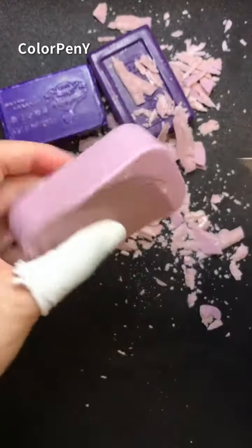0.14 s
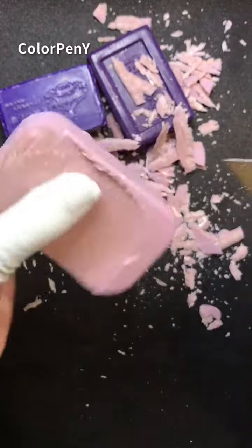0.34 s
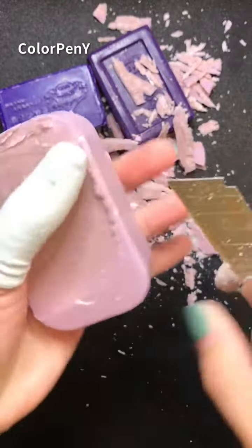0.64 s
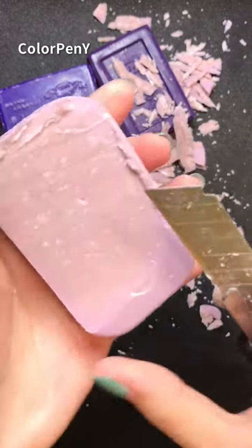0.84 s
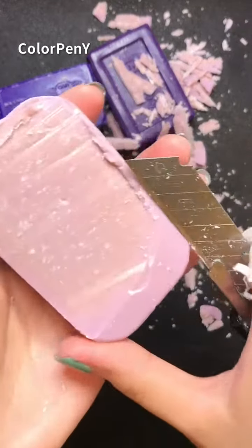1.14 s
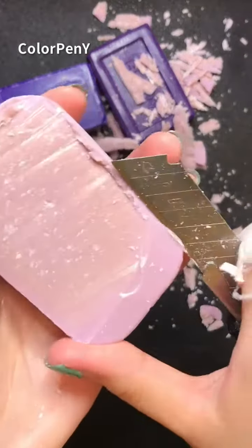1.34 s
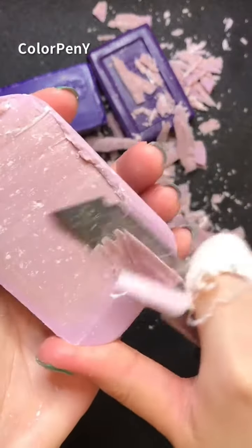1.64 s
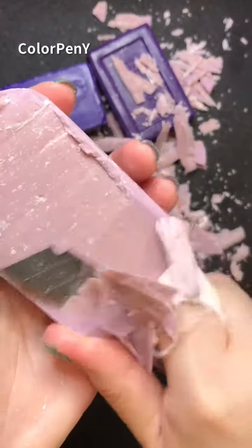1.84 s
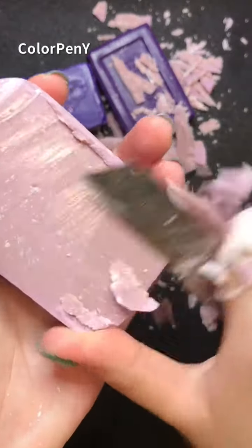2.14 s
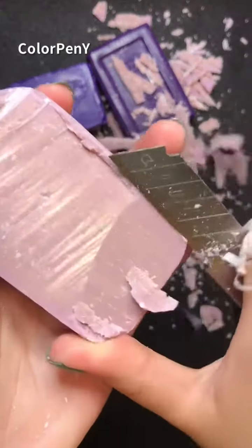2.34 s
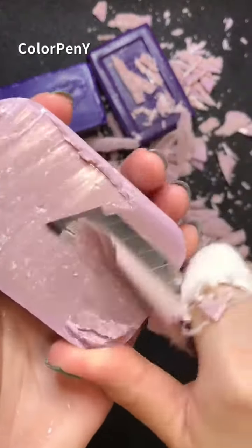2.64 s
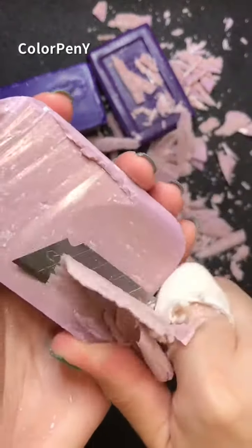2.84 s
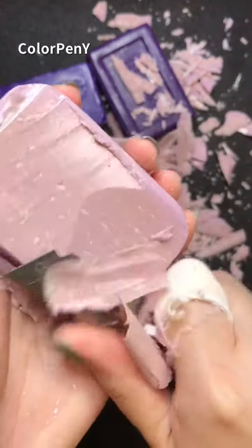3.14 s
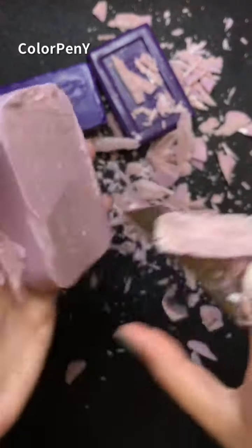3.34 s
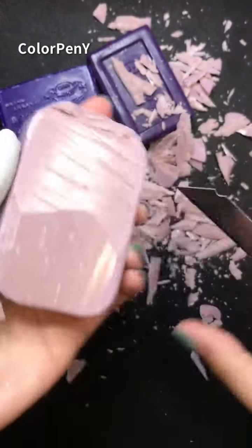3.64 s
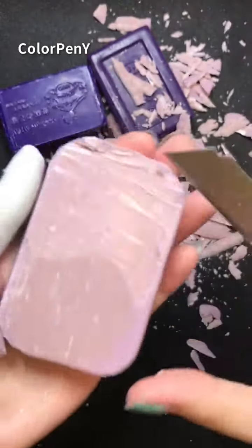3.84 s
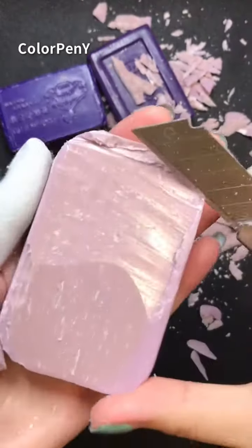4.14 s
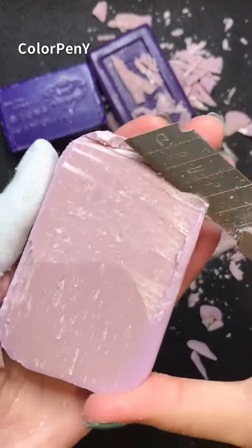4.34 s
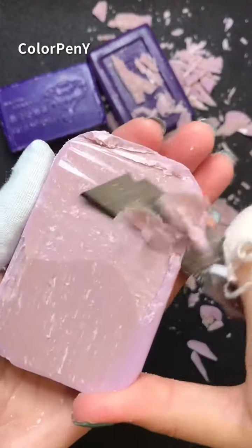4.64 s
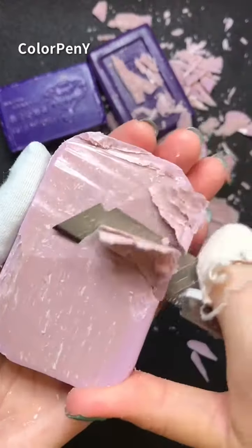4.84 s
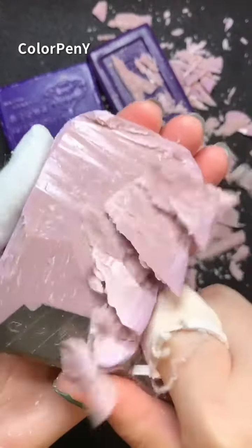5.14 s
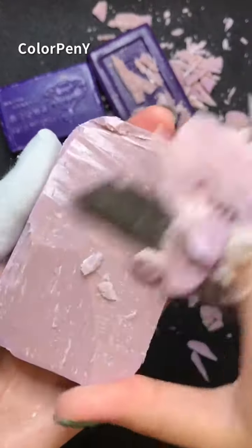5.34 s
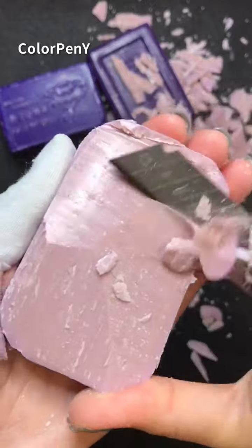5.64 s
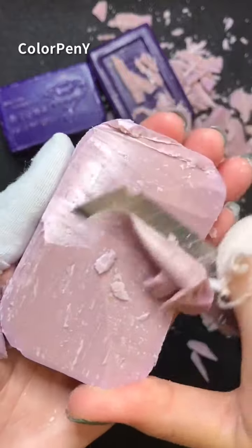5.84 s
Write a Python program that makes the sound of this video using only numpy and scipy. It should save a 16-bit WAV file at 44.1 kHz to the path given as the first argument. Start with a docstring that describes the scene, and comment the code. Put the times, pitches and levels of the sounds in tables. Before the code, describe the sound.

A thin steel blade shaves a bar of hard soap close to the microphone. Light crackles and one small ping of steel come first. Then hissing, scraping strokes follow in groups, with curls snapping off crisply, crumbs pattering and heavier flakes thudding softly onto a table. After a brief lull, the carving builds again to another cluster of sharp cracks. A faint ventilation rumble fills the quiet room.

```python
"""A thin steel blade shaves a hard bar of soap, close up: the curls crack and snap, ringing flake and bar.
The edge slips in bursts of tiny fractures and hisses along the soap while crumbs patter.
The steel pings once on touching the bar and sometimes sings as it drags.
Heavy flakes thud onto a table. A faint ventilation rumble fills the quiet room."""
import sys
import numpy as np
from scipy import signal
from scipy.fft import rfft, irfft, next_fast_len
from scipy.io import wavfile

SR = 44100
rng = np.random.default_rng(int(sys.argv[2]) if len(sys.argv) > 2 else 0)


def generate_wav(sig):
    """Save sig (samples, or channels by samples) to the path in sys.argv[1] as 16-bit PCM at SR."""
    pcm = np.round(np.clip(np.atleast_2d(sig).T, -1, 1) * 32767).astype(np.int16)
    wavfile.write(sys.argv[1], SR, pcm)


N = 265041


def gain(db):
    """Decibels to amplitude."""
    return 10 ** (np.asarray(db) / 20)


def unit_rms(x):
    """Scales to rms 1."""
    return x / np.sqrt(np.mean(x ** 2) + 1e-20)


def log_interp(points, hz):
    """Interpolates on a log-frequency axis."""
    freq_hz, value = np.transpose(points)
    return np.interp(np.log(hz + 1), np.log(freq_hz + 1), value)


def add(mix, start_s, sound):
    """Mixes a sound in at start_s."""
    part = mix[round(start_s * SR):][:len(sound)]
    part += sound[:len(part)]


def colour(x, spectrum):
    """Filters by a spectrum in dB."""
    size = next_fast_len(len(x))
    response = gain(log_interp(spectrum, np.fft.rfftfreq(size, 1 / SR)))
    return irfft(rfft(x, size) * response, size)[:len(x)]


def resonate(x, hz, width_hz):
    """Two-pole resonance."""
    r = np.exp(-np.pi * width_hz / SR)
    return signal.lfilter([1, 0, -r], [1, -2 * r * np.cos(2 * np.pi * hz / SR), r * r], x)


def mode(x, hz, width_hz):
    """Resonance at rms 1."""
    return unit_rms(resonate(x, hz, width_hz))


def flicker(per_s):
    """Straight lines between Gaussian random values."""
    steps = int(N / SR * per_s) + 2
    return np.interp(np.arange(N) / SR * per_s, np.arange(steps), rng.standard_normal(steps))


def grains(per_s, spread_db, wash):
    """Random ticks of uneven size over smooth noise."""
    ticks = gain(spread_db * np.minimum(rng.exponential(1, N), 2)) * (rng.random(N) < per_s / SR)
    puffs = signal.lfilter([1], [1, -0.96], ticks) * rng.standard_normal(N)  # about 0.5 ms each
    return unit_rms(puffs) + wash * rng.standard_normal(N)


def effort(spells, column, rest_db=-np.inf, sag_db_per_s=0):
    """Gain of the hand's work: each spell sets in fast, holds or drifts, then falls to rest."""
    attack_db_per_s, release_db_per_sqrt_s = 700, 51
    t, rows = np.arange(N) / SR, np.array(spells)[:, :, None]
    start_s, end_s = rows[:, 0], rows[:, 1]
    attack_db = attack_db_per_s * np.maximum(start_s - t, 0)
    release_db = release_db_per_sqrt_s * np.sqrt(np.maximum(t - end_s, 0))
    sag_db = sag_db_per_s * (t - (start_s + end_s) / 2)
    level_db = rows[:, column] - attack_db - release_db - sag_db
    return gain(np.maximum(level_db.max(0), rest_db))


# freq_hz, relative_db
AIR_SPECTRUM = [(25, -45), (45, -8.5), (100, -14.5), (300, -17), (480, -24.5), (1700, -33.5), (7000, -46),
                (16000, -44)]
# centre_hz, width_hz, relative_db
RUMBLE_BANDS = [(64.4, 14, 3.5), (147.8, 15.5, -0.5)]
# time_s, level_db
RUMBLE_LEVELS = [(0, -52.5), (0.7, -45), (1.3, -49.5), (1.9, -50), (2.8, -44.5), (3.9, -59.5), (6, -53)]


def ventilation():
    """Steady air noise with narrow rumbling bands that come and go."""
    rumble = sum(gain(db + 0.89 * flicker(per_s=3.06)) * mode(rng.standard_normal(N), hz, width_hz)
                 for hz, width_hz, db in RUMBLE_BANDS)
    rumble_db = np.interp(np.arange(N) / SR, *np.transpose(RUMBLE_LEVELS))
    air = colour(rng.standard_normal(N), AIR_SPECTRUM)
    return gain(-51.5) * unit_rms(air) + gain(rumble_db) * unit_rms(rumble)


# freq_hz, t60_s
ROOM_DECAY = [(500, 0.52), (3000, 0.33), (14000, 0.028)]


def room(x):
    """Diffuse reverb, treble dying first; pieces land in different spots, so two tails alternate."""
    out, predelay = np.zeros(N), np.zeros(260)
    angle = 2 * np.pi * 170 * np.arange(N) / N
    for share in (abs(np.cos(angle)), abs(np.sin(angle))):
        hz, t, spectrum = signal.stft(rng.standard_normal(SR // 2), SR, nperseg=512)
        decay = gain(-60 * t / log_interp(ROOM_DECAY, hz)[:, None])
        tail = np.concatenate([predelay, signal.istft(spectrum * decay, SR, nperseg=512)[1]])
        out += signal.fftconvolve(x * share, tail / np.linalg.norm(tail))[:N]
    return out


# pitch_hz, width_hz, relative_db
TABLETOP_MODES = [(127, 38, 0), (200, 67, 0.5), (252, 140, -1), (409, 165, -4)]
# start_s, peak_db
THUDS = [(1.613, -38), (1.826, -30), (1.945, -35), (2.174, -22.5), (2.361, -22.5), (2.396, -19.5),
         (2.4402, -14), (2.4497, -19.5), (3.012, -25), (3.264, -19.5), (3.293, -21), (3.542, -20),
         (3.683, -17.5), (5.099, -29), (5.419, -24.5), (5.582, -15.5), (5.649, -12.5), (5.705, -21)]


def thuds():
    """Heavy flakes knock the damped table top with a soft push and release."""
    push = np.gradient(np.pad(signal.windows.hann(170), (120, 3000)))
    knock = sum(gain(db) * mode(push, hz, width_hz) for hz, width_hz, db in TABLETOP_MODES)
    knock = signal.lfilter(*signal.butter(2, 95, "high", fs=SR), knock)  # top too small for deep bass
    out = np.zeros(N)
    for start_s, peak_db in THUDS:
        add(out, start_s, gain(peak_db) * knock / abs(knock).max())
    return out


# pitch_hz, relative_db, t60_s
FREE_BLADE_MODES = [(1914, 2, 0.019), (4510, -5, 0.024), (5740, -1, 0.016), (7040, 2.5, 0.012)]


def blade_ping(start_s=1.0305, gain_db=-15, rise_ms=0.53):
    """The free blade taps the bar once and rings briefly."""
    out, t = np.zeros(N), np.arange(0, 0.05, 1 / SR)
    ring = sum(gain(db - 60 * t / t60_s) * np.sin(2 * np.pi * hz * t)
               for hz, db, t60_s in FREE_BLADE_MODES)
    rise = 1 - np.exp(-1000 * t / rise_ms)
    add(out, start_s, gain(gain_db) * rise * ring)
    return out


# pitch_hz, width_hz, relative_db (upper modes only)
DRAGGED_BLADE_MODES = [(1700, 230), (2800, 300, 3), (3600, 260, 1), (5900, 400, -5)]
# start_s, end_s, upper_modes_db, lowest_mode_db
DRAGS = [(2.155, 2.24, -42, -66), (4.38, 4.65, -60, -80), (5.31, 5.4, -51, -46.5)]


def blade_singing():
    """Rough rubbing rings the narrow modes of the steel."""
    rub = grains(per_s=300, spread_db=5, wash=0.7)
    lowest = mode(rub, *DRAGGED_BLADE_MODES[0])
    upper = sum(gain(db) * mode(rub, hz, width_hz) for hz, width_hz, db in DRAGGED_BLADE_MODES[1:])
    return unit_rms(upper) * effort(DRAGS, column=2) + lowest * effort(DRAGS, column=3)


# pitch_hz, width_hz, relative_db
SOAP_MODES = [(1035, 730, 10), (1700, 980, 7.5), (2780, 740, 13.5), (4170, 1160, 12), (4200, 1800, 7),
              (5830, 1500, 15.5), (6870, 1100, 7)]


def soap_ring(strike, first_mode):
    """The bar's modes from first_mode up, each struck more or less by chance."""
    return unit_rms(sum(gain(db + rng.normal(0, 1.5)) * mode(strike, hz, width_hz)
                        for hz, width_hz, db in SOAP_MODES[first_mode:]))


def fizz(strike, band_hz=(6600, 15300)):
    """The treble of a fracture, above the bar's modes."""
    return unit_rms(signal.lfilter(*signal.butter(2, band_hz, "band", fs=SR), strike))


# freq_hz, relative_db
HISS_SPECTRUM = [(2500, -4.5), (4500, -5), (7500, 3.5), (10500, 1.5), (15500, 4)]
# start_s, end_s, crumbs_db, hiss_db
STROKES = [(0, 0.592, -58, -53), (0.668, .78, -56, -54.5), (1.04, 1.19, -54.5, -64),
           (1.441, 1.62, -57.5, -65), (1.616, 1.7, -47, -42), (1.735, 1.843, -53, -43),
           (1.913, 1.958, -45, -44), (2.052, 2.15, -58.5, -53.5), (2.16, 2.247, -47.5, -49),
           (2.36, 2.873, -45.5, -43.5), (2.89, 2.97, -59, -50), (2.977, 3.152, -43.5, -49.5),
           (3.256, 3.81, -43.5, -45), (4.7, 4.96, -59, -49.5), (5.013, 5.237, -50, -47),
           (5.305, 5.526, -55, -47), (5.581, 6.05, -47, -46)]


def scrape():
    """Crumbs patter, each ringing one mode; the edge hisses along the soap in bands that swell by turns."""
    pitched = sum(gain(db) * mode(grains(per_s=60, spread_db=4.5, wash=1.2), hz, width_hz)
                  for hz, width_hz, db in SOAP_MODES)
    dull = mode(grains(per_s=100, spread_db=26, wash=0.65), hz=430, width_hz=1630)
    crumbs = unit_rms(pitched) + 0.7 * dull
    dust = colour(grains(per_s=320, spread_db=5.6, wash=1), HISS_SPECTRUM)
    bands = sum(gain(8 * flicker(per_s=11)) * resonate(dust, hz, 0.099 * hz) * hz
                for hz in np.geomspace(5300, 13800, 7))
    hiss = unit_rms(unit_rms(dust) + unit_rms(bands))
    crumbs *= effort(STROKES, column=2, rest_db=-64, sag_db_per_s=18.5)
    hiss *= effort(STROKES, column=3, rest_db=-68, sag_db_per_s=-0.5)
    return gain(2.5 * flicker(per_s=50)) * (crumbs + hiss)


# peak_s, half_length_ms, ring_db, pitch_hz, treble_db
SLIPS = [(1.129, 23, -47.5, 3850, -71), (1.453, 1.35, -36, 2050, -52), (1.5503, 2.3, -45, 3960, -39),
         (1.5784, 3.4, -38, 3850, -39), (1.654, 1.9, -30.5, 3820, -32.5), (1.6733, 1.5, -34.5, 4360, -31),
         (1.739, 2.1, -32.5, 1680, -39), (1.768, 1.7, -34, 2320, -35), (1.798, 2.1, -32, 2540, -33),
         (1.831, 2.3, -25, 2760, -23), (1.8776, 2.4, -33, 3940, -33), (1.9495, 1.9, -35, 3400, -25.5),
         (2.176, 2.3, -26.5, 3400, -28), (2.356, 0.9, -24, 1960, -22), (2.497, 8.9, -28.5, 2200, -50),
         (2.577, 2.8, -36, 2040, -56), (2.6694, 3.8, -30, 1640, -33.5), (2.731, 4, -34, 1590, -33),
         (2.767, 3.2, -31, 1650, -29.5), (2.793, 2.1, -33, 1730, -33), (3.007, 2.2, -17.5, 2800, -20.5),
         (3.18, 3.3, -42.5, 3770, -42.5), (3.277, 2.5, -21.5, 2660, -50), (4.036, 3.1, -69, 3690, -50),
         (4.12, 1.8, -29.5, 3780, -40.5), (4.432, 3.1, -43.5, 2730, -52), (4.482, 4, -46.5, 2770, -47),
         (4.567, 2.9, -42, 2670, -47), (4.5868, 2.8, -41.5, 2640, -41), (4.6532, 3.3, -39, 2760, -36.5),
         (4.7025, 3.5, -37.5, 1720, -37), (4.807, 5.5, -42, 1720, -39), (5.0168, 3.5, -36, 1710, -29.5),
         (5.1413, 1.8, -30.5, 3500, -32), (5.166, 3.4, -25, 2120, -27.5), (5.313, 1, -33.5, 1620, -53),
         (5.4123, 2.5, -19.5, 3140, -25), (5.491, 7.2, -32.5, 2890, -52), (5.642, 2.8, -29.5, 4100, -55),
         (5.667, 1.4, -26, 2880, -50), (5.914, 2.9, -50, 1700, -41.5)]


def slips():
    """The edge slips: dense tiny fractures under a short swell; fine dust fizzes on after it."""
    out, ms = np.zeros(N), np.arange(-1000, 2000) / SR * 1000
    skew = np.where(ms < 0, 1.15, 0.95)  # rises faster than it fades
    for peak_s, half_length_ms, ring_db, pitch_hz, treble_db in SLIPS:
        noise, roughness = rng.standard_normal((2, len(ms)))
        rub = unit_rms(noise * gain(3.2 * roughness))
        swell_db = -5.5 * abs(skew * ms / (0.89 * half_length_ms)) ** 0.94
        linger_db = np.where(ms > 0, 0.5 * swell_db, swell_db)
        ring = unit_rms(mode(rub, pitch_hz, 0.048 * pitch_hz) + 1.3 * mode(rub, hz=1440, width_hz=3700))
        body = gain(ring_db) * ring + gain(treble_db) * soap_ring(rub, first_mode=4)
        dust = gain(treble_db - 3 + linger_db) * fizz(rub)
        add(out, peak_s + ms[0] / 1000, gain(swell_db) * body + dust)
    return out


# time_s, body_energy_db, pitch_hz, fizz_energy_db (energies re 1 ms at full scale)
CRACKS = [(0.121, -17, 5040, -23.5), (0.2263, -18.5, 2800, -54), (0.244, -21.5, 3900, -32),
          (0.2927, -26.5, 3930, -40), (0.3196, -29, 3840, -44), (0.369, -25, 4070, -30),
          (0.4123, -21.5, 3400, -48), (0.4578, -26.5, 6400, -35), (0.4922, -33, 2730, -34),
          (0.6851, -16, 2340, -25), (0.702, -23.5, 2740, -51), (1.0324, -21, 3000, -19.5),
          (1.752, -34, 5500, -33), (5.227, -49, 6200, -51), (5.247, -39, 6500, -43),
          (2.829, -34, 5500, -28), (2.094, -37.5, 5500, -50), (2.1162, -34, 1780, -55),
          (2.132, -39, 2700, -45), (2.915, -43, 3000, -43), (5.275, -40, 7500, -46),
          (5.767, -32.5, 6500, -46), (5.926, -51, 2500, -42), (1.07, -24, 5240, -33),
          (1.2418, -37, 6150, -55), (1.5748, -33.5, 5320, -45), (1.6161, -22.5, 5030, -26.5),
          (1.692, -22, 5830, -20.5), (1.9132, -28, 2670, -26.5), (2.04, -25, 6200, -33),
          (2.0484, -19.5, 2830, -25), (2.2966, -25.5, 2620, -36), (2.3382, -19, 3340, -22),
          (2.364, -8, 2180, -30), (2.3913, -12, 1810, -14.5), (2.399, -15.5, 2550, -28),
          (2.442, -13, 2410, -23), (2.451, -9.5, 2220, -20), (2.5553, -18.5, 2030, -41),
          (2.714, -31, 2590, -29), (2.8157, -15, 6450, -20), (2.853, -24, 1040, -26),
          (3.0156, -11.5, 1590, -39), (3.14, -24, 5100, -50), (3.222, -31.5, 4320, -51),
          (3.2618, -5.5, 4400, -19), (3.291, -5.5, 3130, -29), (3.298, -17, 3000, -12.5),
          (3.3046, -7, 2900, -27), (3.3081, -12.5, 3100, -30), (3.2473, -16, 1670, -23),
          (3.3977, -26, 8400, -21), (3.469, -26, 4970, -41), (3.4756, -17, 2920, -19),
          (3.499, -21.5, 5100, -28), (3.51, -17, 4700, -23), (3.525, -26, 2800, -40),
          (3.5433, -9, 6000, -31), (3.5524, -8.5, 5060, -16), (3.556, -11.5, 6060, -23),
          (3.628, -28, 3400, -40), (3.657, -19.5, 2060, -52), (3.677, -19, 2680, -26),
          (3.6841, -12.5, 2400, -46), (3.7519, -26.5, 4150, -45), (3.8208, -28.5, 5200, -34),
          (4.509, -34.5, 6300, -33), (4.97, -35, 8000, -40), (5.0995, -13.5, 7100, -18.5),
          (5.1066, -21, 1660, -19), (5.21, -25, 2400, -32), (5.4225, -12, 1950, -34),
          (5.584, -11, 1810, -17), (5.648, -6.5, 2890, -15.5), (5.6488, -7.5, 2550, -12.5),
          (5.6552, -13.5, 2250, -36), (5.622, -28, 2470, -45), (5.686, -39, 6400, -42),
          (5.7062, -10.5, 2110, -18.5), (5.72, -21.5, 2670, -40)]


def cracks():
    """A curl breaks: a short creak, one hard fracture and after-ticks ring the flake and the bar."""
    body_top_hz = 8400  # soap is too soft to ring higher
    out, ms = np.zeros(N), np.arange(-250, 650) / SR * 1000
    creak_db = np.where(ms < 0, 4.1 * ms - 7, -2.8 * ms)
    for time_s, body_db, pitch_hz, fizz_db in CRACKS:
        noise, roughness = rng.standard_normal((2, len(ms)))
        fracture = noise * gain(12.1 * roughness) * np.maximum(ms, 0) * np.exp(-abs(ms) / 0.14)
        creak_and_ticks = roughness * gain(2 * noise + creak_db)
        strike = unit_rms(fracture) + 0.94 * unit_rms(creak_and_ticks)
        flake = mode(strike, pitch_hz, 0.28 * pitch_hz)
        bar = soap_ring(strike, first_mode=0 if body_db > -15 else 2)  # only big pieces move low modes
        band_hz = (0.24 * pitch_hz, body_top_hz)  # a small flake has no bass
        body = signal.lfilter(*signal.butter(2, band_hz, "band", fs=SR), flake + 1.22 * bar)
        crack = gain(body_db) * unit_rms(body) + gain(fizz_db) * fizz(strike)
        add(out, time_s + ms[0] / 1000, crack / np.sqrt(np.ptp(ms)))
    return out


def scene():
    """Mono mix; cracks, slips and thuds feed the room."""
    cracking, slipping, thudding = cracks(), slips(), thuds()
    reverb = room(gain(-15.5) * cracking + gain(-16) * slipping + gain(-9) * thudding)
    blade = blade_ping() + blade_singing() + scrape()
    return (ventilation() + reverb + thudding + blade + slipping + cracking)[None]


def record(dry):
    """Soft overload, then a low-pass."""
    cutoff_hz = 15900
    lowpass = signal.firwin(511, cutoff_hz, window=("kaiser", 9), fs=SR)
    return signal.oaconvolve(np.tanh(dry), lowpass[None], "same")


dry = scene()
out = record(dry)
generate_wav(out)
```